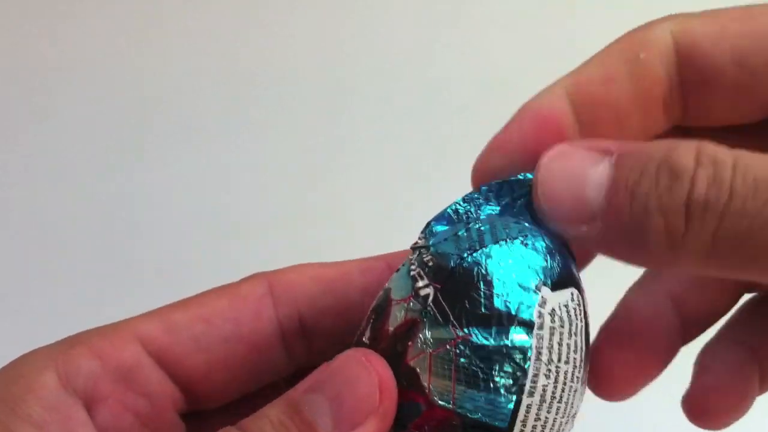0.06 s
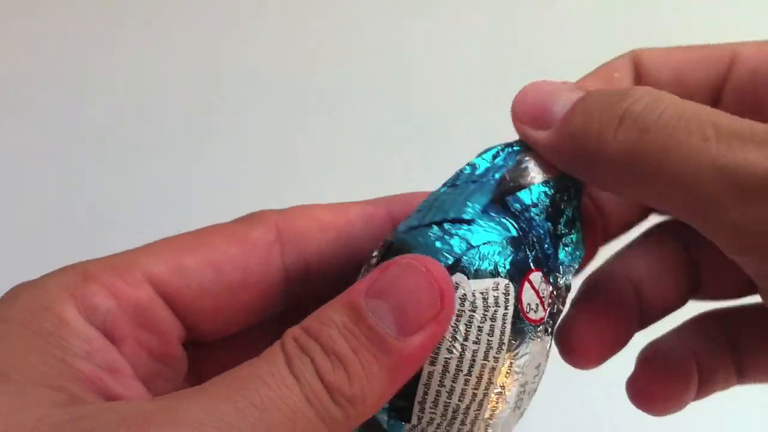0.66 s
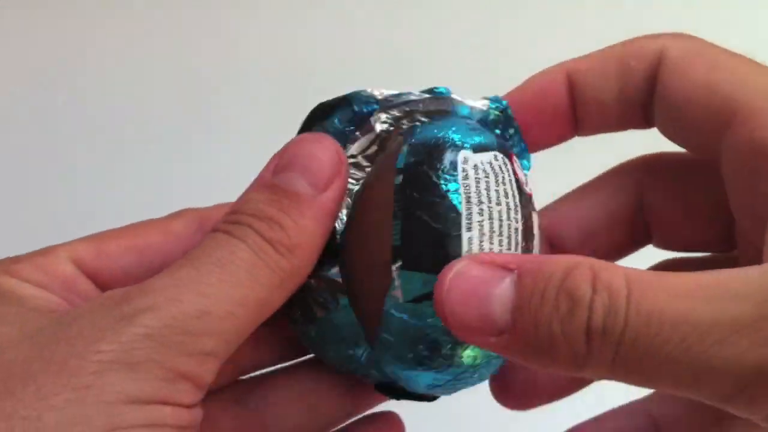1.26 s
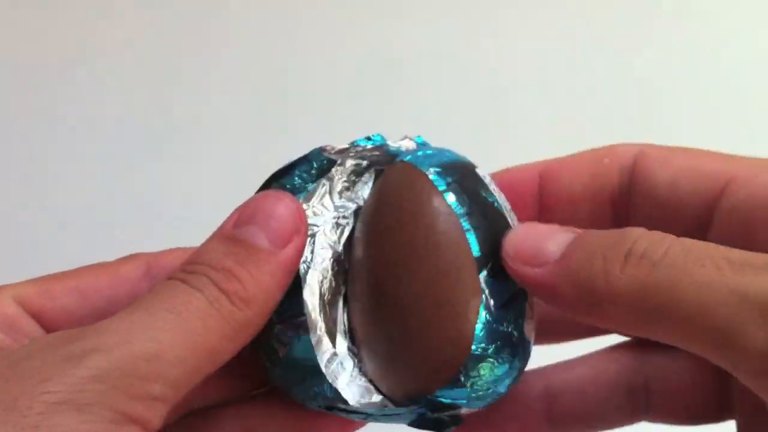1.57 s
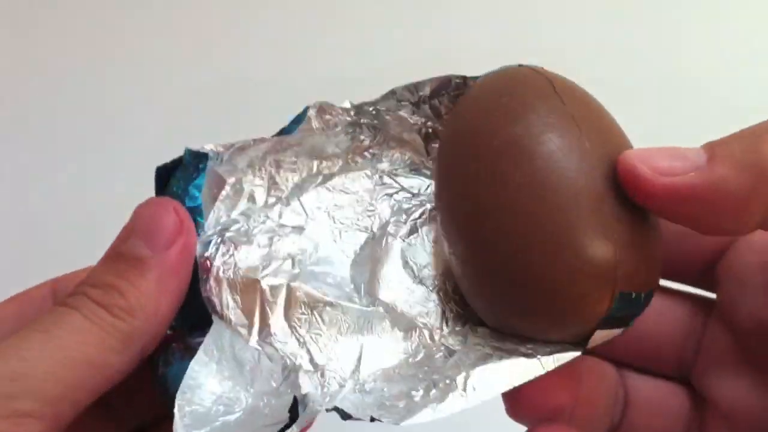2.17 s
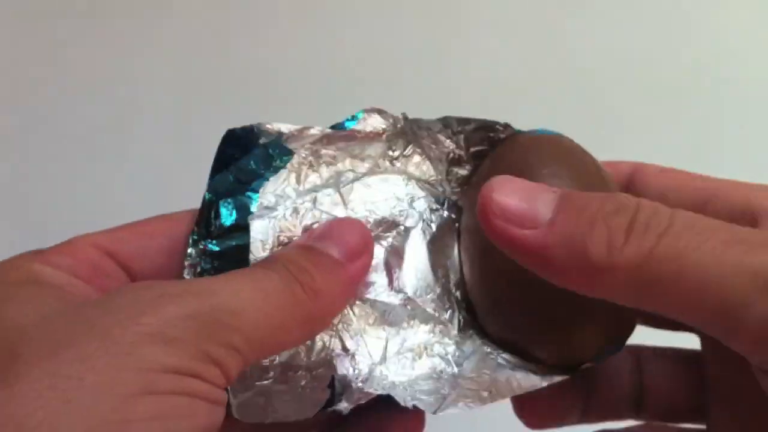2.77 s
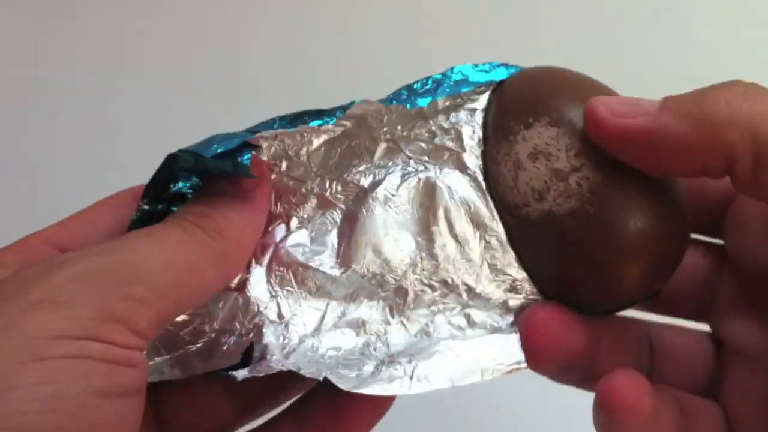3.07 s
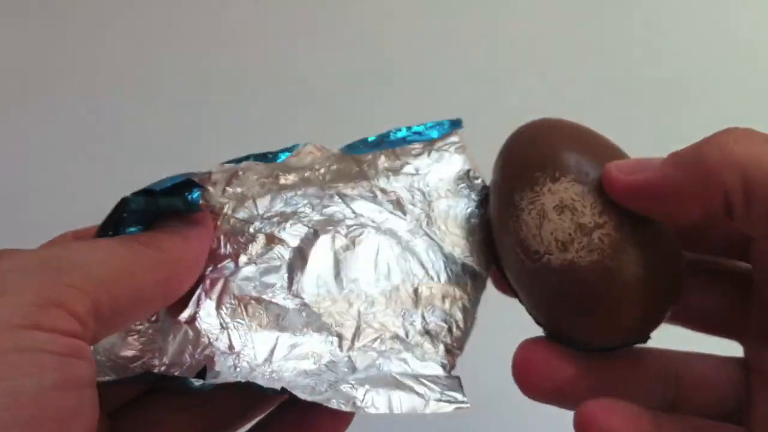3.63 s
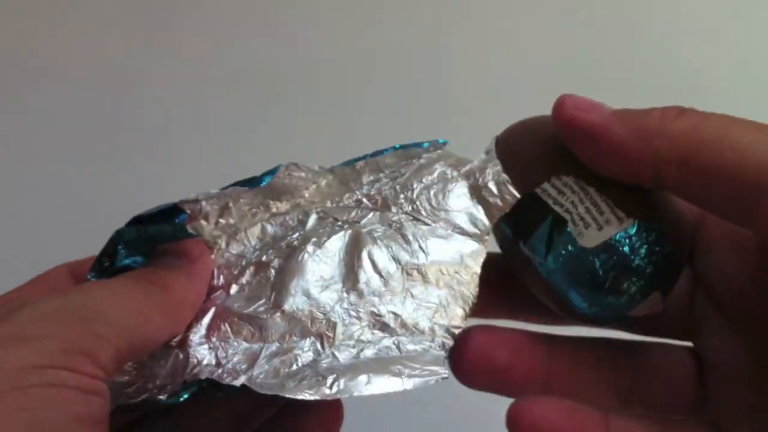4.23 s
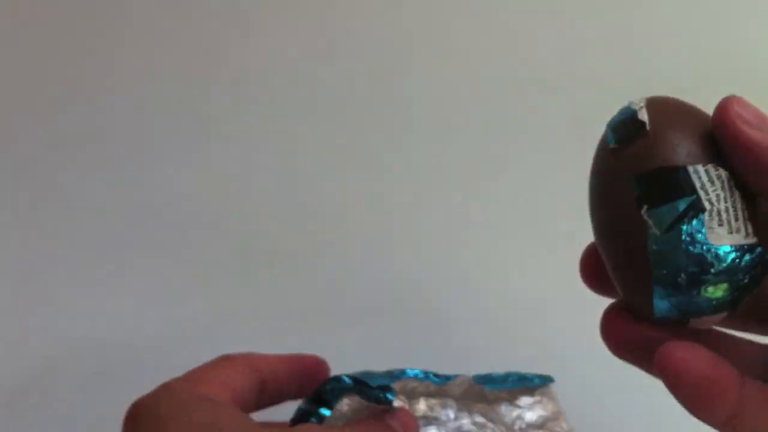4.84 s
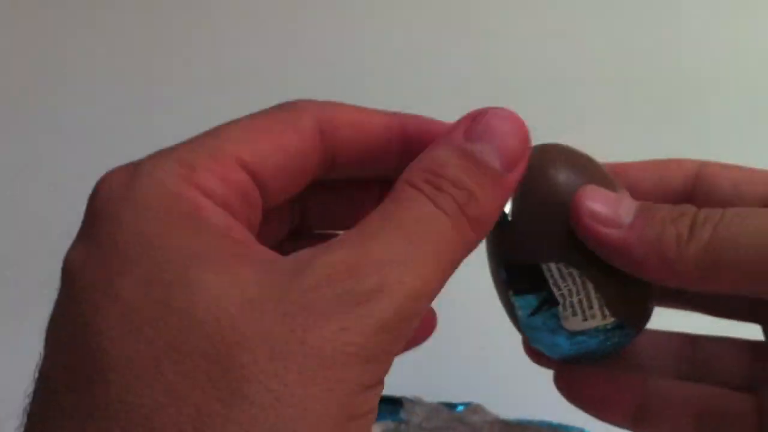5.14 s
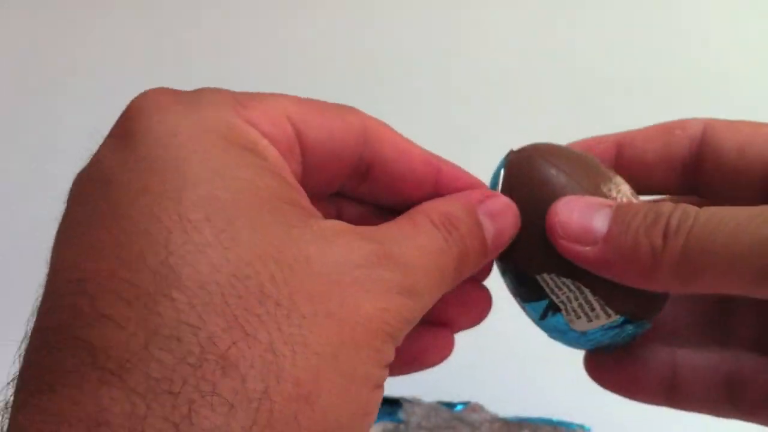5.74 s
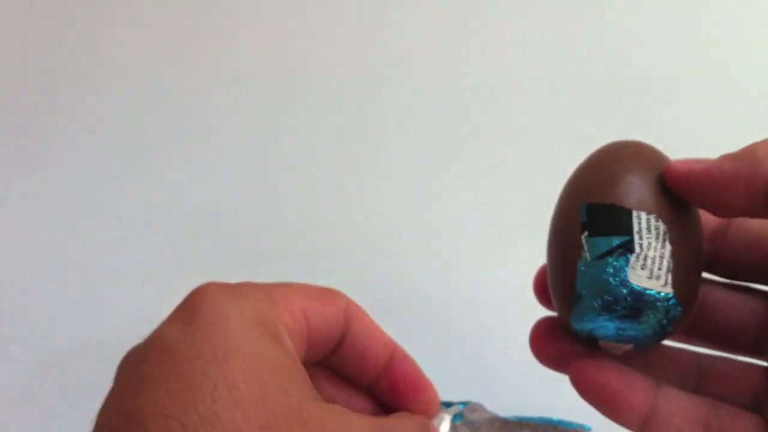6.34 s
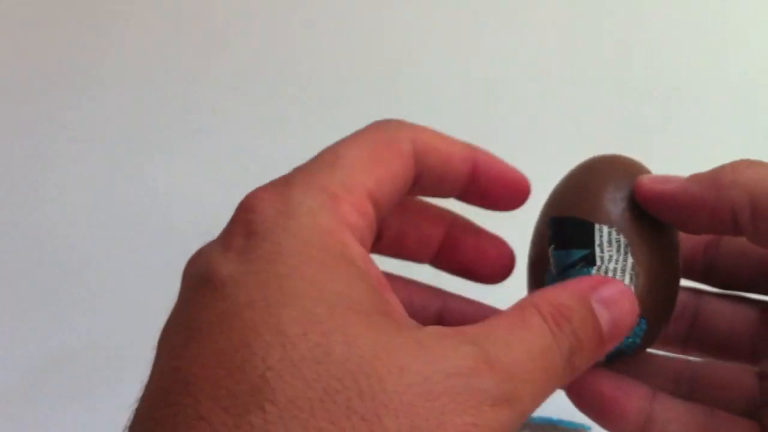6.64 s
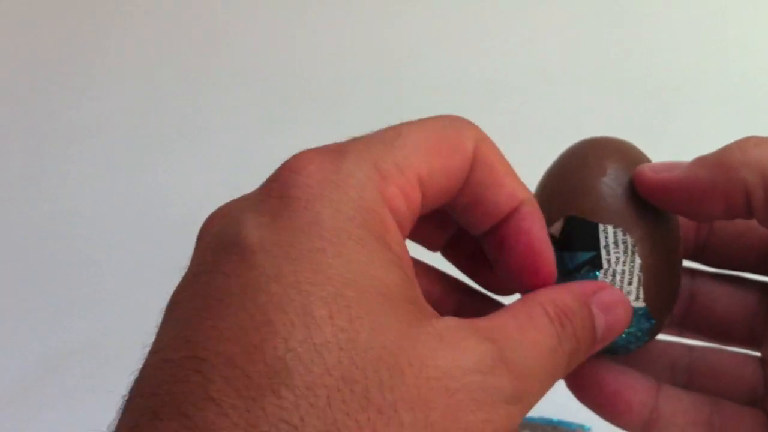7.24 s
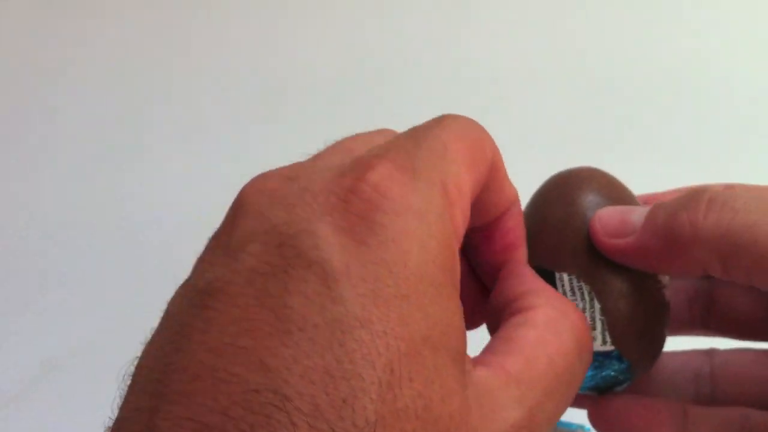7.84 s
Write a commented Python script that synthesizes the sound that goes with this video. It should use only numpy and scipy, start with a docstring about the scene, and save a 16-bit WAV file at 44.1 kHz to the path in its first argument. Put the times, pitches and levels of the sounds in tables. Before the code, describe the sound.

Bright, uneven crinkling comes from a thin foil wrapper as fingers rub it and pull it from a chocolate egg. Crisp snaps and short tearing rushes stand out, and the hollow shell gives a few soft knocks. The crackle is busiest in the middle, then thins to scattered ticks and a brief rustle. It is heard up close in a small room with faint hiss and a low drone.

```python
"""A sharp snap, then crackling: two hands peel thin foil off a hollow chocolate egg, close by in a
small room. Sudden peels and swelling rubs keep up the crackle, with single snaps, short avalanches,
scrapes and a few round knocks on top. Buckling foil releases its elastic energy as an impulse, which
sounds in three ways: the crease ticks, the sheet around it flexes, and the hollow shell knocks.
Faint hiss and a low drone lie underneath."""
import sys
import numpy as np
from scipy import signal
from scipy.fft import rfft, irfft
from scipy.io import wavfile
from scipy.ndimage import uniform_filter1d

SR = 44100
rng = np.random.default_rng(int(sys.argv[2]) if len(sys.argv) > 2 else 0)


def output_pcm(signal):
    """Save a mono or channel-first signal as 16-bit PCM at the path in sys.argv[1].

    Samples are clipped to [-1, 1] before scaling.
    """
    pcm = np.clip(np.atleast_2d(signal).T, -1, 1) * 32767
    wavfile.write(sys.argv[1], SR, np.round(pcm).astype(np.int16))


N = 352780
TIME = np.arange(N) / SR


def peeling(parts, peak_buckles_per_s=5000, density_power=0.45):
    """Crackling noise: a harder pull buckles the foil more often, so a light fizz grows to a rush."""
    pulls = effort()
    per_s = peak_buckles_per_s * (pulls[0] / pulls[0].max()) ** density_power
    grains = crackle(per_s, spread_db=5.5, hiss=0.61, even_s=0.041, clump_db=1.35)
    return sum(signal.oaconvolve(grains * pull, part)[:N] for pull, part in zip(pulls, parts))


def effort(grip_until_s=5.2, attack_s=0.0078, release_s=0.0087, rub_depth_db=21.5, rub_shell_db=-8.5):
    """Incoherent sources add in power: grip, peels and rubs set the drive of crease, sheet and shell."""
    # The wrapper stirs while it is held. The levels of crease, sheet and shell, in dB.
    grip_db = [-72, -72.5, -76]
    # Foil pulled off in one go. Each row: start and length in seconds, build-up in dB,
    # then the closing levels of crease, sheet and shell in dB.
    peels = [(0.804, 0.065, -4, -50, -54.5, -63), (1.126, 0.13, 11, -54, -63, -55.5),
             (1.882, 0.15, 0.5, -57, -61, -62), (2.086, .13, 13, -48, -48, -56.5),
             (2.339, 0.068, 4, -45, -46.5, -47), (2.69, 0.021, 0.5, -42.5, -45, -45),
             (2.727, .11, -3.5, -53.5, -59.5, -61.5), (2.988, 0.149, 3.5, -40, -46.5, -51.5),
             (3.394, 0.019, -5, -56.5, -57, -55.5), (3.59, 0.14, 8.5, -36.5, -39.5, -40.5),
             (3.743, 0.013, -1, -40.5, -43.5, -48), (4.421, 0.035, 0.5, -41, -46, -52.5),
             (4.465, .072, 4, -42.5, -48.5, -57.5), (4.72, 0.16, 0, -59, -69, -80)]
    # Fingers press and slide. Each row: peak time, rise and fall in seconds, crease and sheet in dB.
    rubs = [(0.234, 0.095, 0.063, -49, -62), (0.634, 0.11, 0.11, -47, -59.5),
            (1.374, 0.091, 0.23, -47.5, -53), (1.6, 0.68, 0.63, -58.5, -64.5),
            (2.28, 0.1, 0.11, -64, -58.5), (2.95, 0.15, 0.24, -49, -55), (3.17, 0.066, 0.25, -53.5, -57.5),
            (3.359, 0.087, 0.13, -56.5, -64), (3.594, 0.031, .04, -47.5, -54),
            (3.891, 0.099, 0.11, -55, -54.5), (4.243, 0.084, 0.09, -46, -49),
            (5.1, 0.16, 0.31, -58.5, -62.5), (5.48, 0.14, 0.077, -68, -80), (6.47, 0.28, .2, -68, -85),
            (6.63, 0.034, 0.42, -62, -64.5)]
    power = np.outer(amp(grip_db), TIME < grip_until_s) ** 2
    for start, length, build_db, *levels_db in peels:
        t = TIME - start
        attack = np.clip(t / attack_s, 0, 1)
        release = np.exp(-np.clip((t - length) / release_s, 0, 20))
        build = amp(build_db * np.clip(t / length - 1, -1, 0))
        power += np.outer(amp(levels_db), attack * release * build) ** 2
    for peak, rise, fall, crease_db, sheet_db in rubs:
        from_peak = np.maximum((peak - TIME) / rise, (TIME - peak) / fall)
        swell = amp(-rub_depth_db * np.minimum(from_peak, 10))
        power += np.outer(amp([crease_db, sheet_db, sheet_db + rub_shell_db]), swell) ** 2
    return np.sqrt(power)


def crackle(per_s, spread_db, hiss, even_s, clump_db, clump_s=0.0039, facets=32):
    """Shot noise: random buckles of many facets, mostly small, merge over the hiss of sliding skin."""
    out = np.zeros(N)
    kicks = amp(spread_db * np.minimum(rng.exponential(1, N), 4.0)) * rng.choice([-1, 1], N)
    kicks *= (rng.random(N) < per_s / SR) / np.sqrt(per_s)
    facet = rng.integers(0, facets, N)
    for k, ring_hz in enumerate(np.geomspace(600, 14000, facets)):
        grain = buckle(ring_hz, settle_s=0.0025, chatter=1.2, ring=3.6, q=7.1)
        out += signal.oaconvolve(kicks * (facet == k), grain)[:N]
    out = evened(out) + hiss * rng.standard_normal(N)
    # The foil sticks and gives way, so the buckles come in clumps.
    knots = np.cumsum(rng.exponential(clump_s, 6000))
    out *= amp(clump_db * np.interp(TIME, knots, rng.standard_normal(len(knots))))
    # The hands release energy at a steady pace, however the buckles share it.
    local_power = uniform_filter1d(out ** 2, int(even_s * SR) + 1)
    return out / np.sqrt(local_power + 1e-9)


def buckle(ring_hz, settle_s, chatter, ring, q, size=700):
    """Impulse excitation: a kick and a dying chatter of wrinkles ring the freed facet's resonance."""
    t = np.arange(size) / SR
    kick = rng.standard_normal(size) * np.exp(-t / settle_s)
    kick *= chatter / np.linalg.norm(kick)
    kick[0] += rng.choice([-1, 1])
    sound = kick + ring * resonate(kick, ring_hz, ring_hz / q)
    return sound / np.linalg.norm(sound)


def snaps(parts):
    """Snap-through: a single crease flips and drives crease, sheet and shell, each by its own amount."""
    # Each row: start in seconds, facet resonance in Hz, levels of crease, sheet and shell in dB.
    flips = [(0.0537, 5100, -38.5, -42.5, -53), (0.4435, 5950, -41.5, -69, -71),
             (0.4732, 1480, -63, -52, -56.5), (0.498, 1620, -51, -52, -54.5),
             (0.7328, 11000, -49, -56.5, -78), (0.808, 8940, -36.5, -45, -62),
             (0.8135, 5800, -38.5, -50, -68), (0.8437, 443, -41, -40, -45.5),
             (1.2483, 11900, -42, -62, -54), (1.406, 7700, -39, -50, -67), (1.469, 7040, -45.5, -55, -56),
             (1.5961, 8700, -40, -48, -68), (1.926, 4350, -46.5, -53, -73), (1.9526, 9500, -43, -61, -65),
             (2.045, 8750, -47, -72, -68), (2.0773, 5700, -24.5, -34.5, -41.5),
             (2.1124, 7800, -39.5, -52, -50), (2.121, 910, -62, -49, -47),
             (2.1416, 4570, -31.5, -42.5, -38), (2.183, 2120, -45, -40, -47),
             (2.2579, 1240, -44, -49.5, -60), (2.3018, 5790, -43.5, -52, -57),
             (2.3189, 290, -43.5, -50, -46.5), (2.329, 5500, -44, -53, -57),
             (2.3639, 4030, -39.5, -42.5, -48), (2.7337, 6720, -41, -65.5, -69),
             (2.8549, 1380, -40.5, -35.5, -37.5), (2.9212, 3150, -51, -46, -64),
             (2.9583, 1460, -56, -43, -53), (2.9842, 820, -48, -45.5, -43), (3.175, 7300, -42.5, -61, -65),
             (3.2314, 7260, -46, -66, -70), (3.393, 540, -43, -44, -45), (3.608, 790, -33, -47, -40),
             (3.8818, 4600, -45.5, -64, -58), (4.0677, 5040, -48, -55, -63), (4.102, 6800, -49.5, -64, -90),
             (5.7746, 9500, -57.5, -79, -66), (6.1055, 5400, -46, -51, -63),
             (6.1421, 9000, -53.5, -60, -65), (6.7475, 10000, -45.5, -70, -66)]
    out = np.zeros(N)
    for start, ring_hz, *levels_db in flips:
        kick = buckle(ring_hz, settle_s=0.0017, chatter=0.8, ring=2.6, q=5.1)
        for part, db in zip(parts, levels_db):
            add(out, start, radiate(kick, part, db))
    return out


def avalanches(parts, fade_s=0.011, shell_db=-9):
    """Chain reaction: one fold sets off its neighbours in a run that starts at once, holds and dies."""
    # Each row: start and length in seconds, levels of crease and sheet in dB.
    runs = [(0.076, 0.015, -44.5, -51), (0.322, 0.016, -45, -58), (0.464, 0.0046, -46.5, -55),
            (1.086, 0.013, -51, -52), (1.876, 0.0053, -48, -48.5), (1.891, 0.0072, -45.5, -47.5),
            (3.305, 0.015, -50, -53.5), (4.444, 0.006, -43.5, -44), (4.954, 0.02, -47.5, -53),
            (5.008, 0.015, -46, -53.5), (5.039, 0.012, -50, -54.5), (5.098, 0.028, -48, -58.5),
            (5.228, 0.011, -51.5, -58.5), (6.579, 0.0074, -42.5, -47.5), (6.66, 0.016, -52, -60.5)]
    grains = crackle(per_s=4100, spread_db=1.0, hiss=0.1, even_s=0.0022, clump_db=10.0)
    out = np.zeros(N)
    t = np.arange(SR // 16) / SR
    for start, length, crease_db, sheet_db in runs:
        envelope = np.exp(-np.maximum(t - 0.69 * length, 0) / fade_s)
        run = grains[round(start * SR):][:len(t)] * envelope
        for part, db in zip(parts, (crease_db, sheet_db, sheet_db + shell_db)):
            add(out, start, radiate(run, part, db, length))
    return out


def stray_ticks(parts, per_s=38, low_hz=5960, high_hz=15000, base_db=-5.5, spread_db=3.5, wrinkles=700):
    """Local instability: lone wrinkles give way at random, ticking louder the harder the pull."""
    out = np.zeros(N)
    crease, sheet, _ = parts
    crease_pull, sheet_pull, _ = effort()
    for when, size, pitch, chance in rng.random((wrinkles, 4)):
        at = int(when * N)
        ring_hz = low_hz * (high_hz / low_hz) ** pitch
        kick = buckle(ring_hz, settle_s=0.0013, chatter=0.51, ring=2.8, q=2.9)
        if chance * wrinkles < per_s * N / SR:
            db = base_db + spread_db * min(-np.log(1 - size), 2)  # relative to the pull
            add(out, at / SR, crease_pull[at] * radiate(kick, crease, db))
            add(out, at / SR, sheet_pull[at] * radiate(kick, sheet, db - 3))
    return out


def scrapes(slips_per_s=1500):
    """Stick-slip: irregular slips ring one band of pitch; a narrow one gives a brief high whistle."""
    # Foil slides under a finger or over the chocolate.
    # Each row: start and length in seconds, band centre and width in Hz, level in dB.
    slides = [(0.051, 0.014, 1475, 383, -45.5), (1.135, .14, 1470, 900, -57.5),
              (1.346, 0.31, 3120, 1190, -58.5), (1.736, 0.024, 4300, 700, -58.5),
              (2.919, 0.0079, 3150, 1620, -39.5), (2.983, 0.039, 1150, 700, -46.5),
              (3.695, 0.043, 2100, 800, -45), (3.718, 0.02, 5700, 400, -39), (4.476, 0.073, 1965, 600, -51),
              (6.186, 0.23, 1070, 1600, -73), (6.198, 0.0087, 1630, 900, -59),
              (6.325, 0.0104, 1290, 1600, -62)]
    out = np.zeros(N)
    for start, length, hz, width, db in slides:
        size = int(length * SR)
        slips = rng.standard_normal(size) * (rng.random(size) < slips_per_s / SR)
        tone = resonate(resonate(slips, hz, width), hz, width)
        add(out, start, amp(db) * evened(tone * signal.windows.tukey(size, 0.4)))
    return out


def hollow_knocks(rise_s=0.0023):
    """Damped oscillation: a few low cycles swell and die as a short, round, hollow knock."""
    # Each row: start in seconds, pitch in Hz, peak level in dB.
    knocks = [(0.8445, 478, -41), (2.1426, 388, -39.5), (2.319, 273, -35)]
    out = np.zeros(N)
    t = np.arange(SR // 20) / SR
    envelope = t / rise_s * np.exp(1 - t / rise_s)
    for start, hz, db in knocks:
        add(out, start, amp(db) * envelope * np.sin(2 * np.pi * hz * t))
    return out


def room(x, early_db=-12, early_s=0.0086, tail_db=-14.0):
    """Reverberation: quick reflections from hands and table, then the room's soft diffuse tail."""
    # Each row: frequency in Hz, time to decay by 60 dB in seconds.
    decay_times = [(200, 0.68), (800, 0.69), (2000, 0.51), (5000, 0.63), (14000, 0.26)]
    t = np.arange(SR // 2) / SR
    early = rng.standard_normal(len(t)) * (rng.random(len(t)) < 0.06)
    early *= np.exp(-t / early_s) * (t > 0.0015)
    diffuse = rng.standard_normal(len(t)) * (t > 0.008)
    hz, age, spectra = signal.stft(diffuse, SR, nperseg=256)
    decay = amp(-60 * age / read(decay_times, hz)[:, None])
    tail = signal.istft(spectra * decay, SR, nperseg=256)[1][:len(t)]
    echoes = amp(early_db) * early / np.linalg.norm(early) + amp(tail_db) * tail / np.linalg.norm(tail)
    return x + signal.oaconvolve(x, echoes)[:N]


def ambience(noise_db=-63):
    """Noise floor: steady broadband noise, with narrow noise bands heard as a wavering low drone."""
    # A quiet room with microphone hiss. Each row: frequency in Hz, relative spectral density in dB.
    noise_spectrum = [(25, -31), (70, -27.5), (102, -22), (140, -8), (270, -5.5), (450, -15), (900, -14.5),
                      (1400, -21.5), (4000, -26), (16000, -32.5)]
    # The room's faint drone. Each row: frequency and bandwidth in Hz, level in dB.
    drone_bands = [(139.1, 13, -75), (156.8, 7.5, -76.5), (249.9, 8.4, -75)]
    gain = amp(read(noise_spectrum, np.fft.rfftfreq(N, 1 / SR)))
    air = irfft(rfft(rng.standard_normal(N)) * gain, N)
    out = amp(noise_db) * evened(air)
    for hz, width, db in drone_bands:
        band = resonate(rng.standard_normal(N), hz, width)
        out += amp(db) * evened(resonate(band, hz, width))
    return out


def response(spectrum, size=2048):
    """Minimum phase: a magnitude spectrum determines a causal impulse response, here of unit energy."""
    hz = abs(np.fft.fftfreq(size, 1 / SR))
    log_gain = np.log(amp(read(spectrum, hz)))
    transfer = np.exp(np.conj(signal.hilbert(log_gain)))
    taps = np.fft.ifft(transfer).real[:size // 2]
    return taps / np.linalg.norm(taps)


def radiate(drive, part, db, seconds=0.005):
    """Convolution: a part filters a short drive; the energy is that of db held for the given seconds."""
    sound = signal.fftconvolve(drive, part)
    return amp(db) * np.sqrt(seconds * SR) * sound / np.linalg.norm(sound)


def resonate(x, hz, width):
    """Second-order resonance with a peak gain of 1 and a Q of at least 1."""
    return signal.lfilter(*signal.iirpeak(min(hz, SR / 2 - 1), max(hz / width, 1), fs=SR), x)


def amp(db):
    """Decibels as an amplitude ratio."""
    return 10 ** (np.asarray(db) / 20)


def evened(x):
    """Normalisation to an rms of 1."""
    return x / np.sqrt(np.mean(x ** 2) + 1e-20)


def read(points, hz):
    """Interpolation on a logarithmic frequency axis."""
    points_hz, values = np.transpose(points)
    return np.interp(np.log(hz + 1), np.log(points_hz + 1), values)


def add(mix, start_s, sound):
    """Superposition: a sound joins the mix at its start time."""
    span = mix[round(start_s * SR):][:len(sound)]
    span += sound[:len(span)]


def scene():
    """Source and filter: buckles sound through three parts and join scrapes and knocks in the room."""
    # The tone colour of each part as heard, the first with a narrow bright peak near 5.8 kHz.
    # Each row: frequency in Hz, relative gain in dB.
    crease = [(1200, -44), (2700, -14.5), (3500, -3), (4600, -2), (5400, 0), (5800, 0), (6300, -5.5),
              (7800, -2), (10500, -7.5), (13000, -7.5), (16000, -10)]
    sheet = [(300, -13.5), (700, -28), (950, -1), (1500, 2), (2300, 1), (3100, -4.5), (4200, -3.5),
             (9000, -45.5)]
    shell = [(30, -30), (95, -25.5), (135, -5.5), (300, -2), (390, -1), (530, 1), (630, 4.5), (700, 2),
             (790, 4), (1080, -13.5), (2500, -50)]
    parts = [response(crease), response(sheet), response(shell)]
    buckles = snaps(parts) + stray_ticks(parts) + peeling(parts) + avalanches(parts)
    return (room(buckles + scrapes() + hollow_knocks()) + ambience())[None]


def record(dry):
    """Band limiting: a linear-phase low-pass removes the treble above 16 kHz."""
    low_pass = signal.firwin(401, 16000, window=("kaiser", 8), fs=SR)
    return signal.oaconvolve(dry, low_pass[None], "same")


dry = scene()
out = record(dry)
output_pcm(out)
```